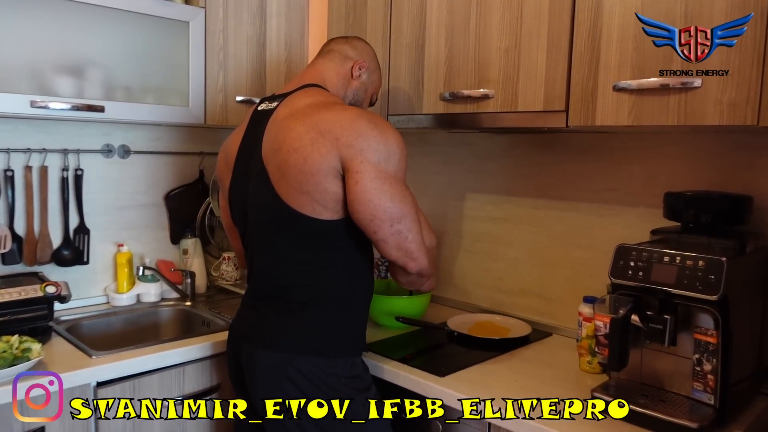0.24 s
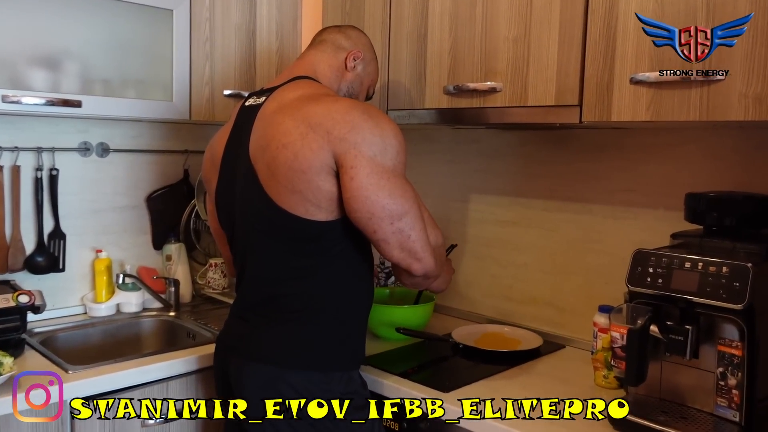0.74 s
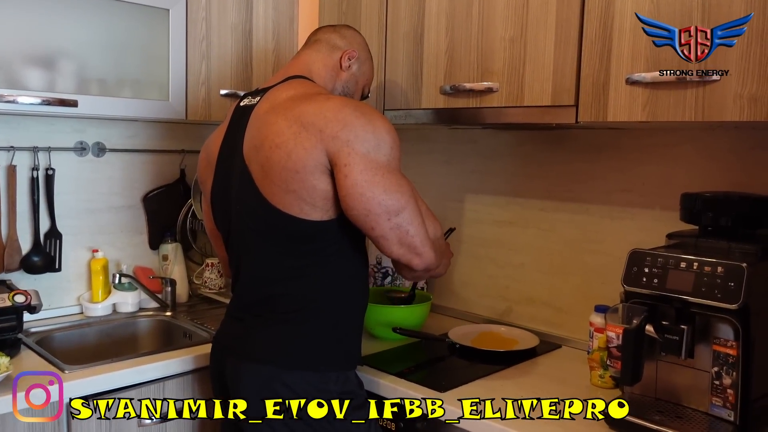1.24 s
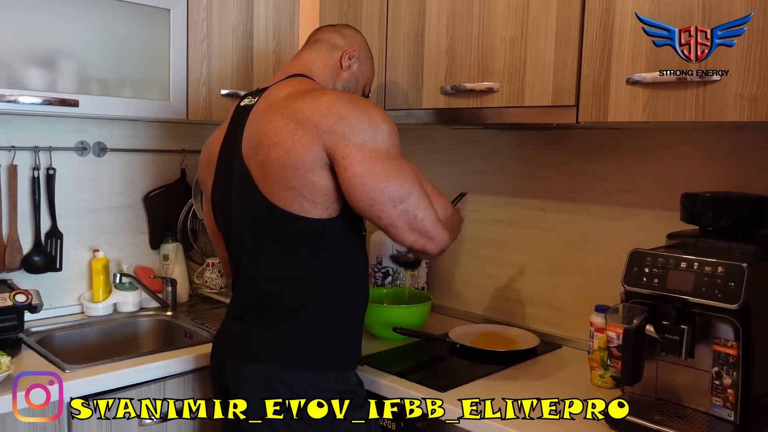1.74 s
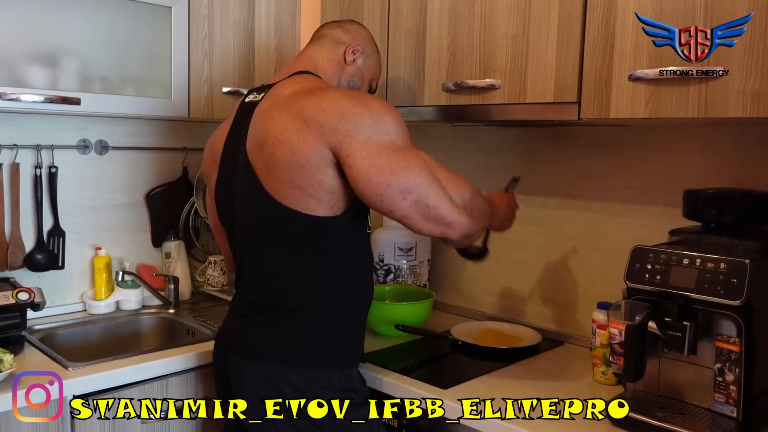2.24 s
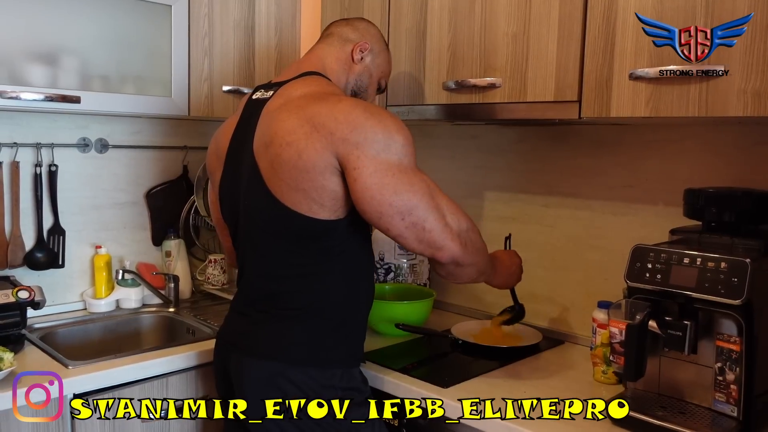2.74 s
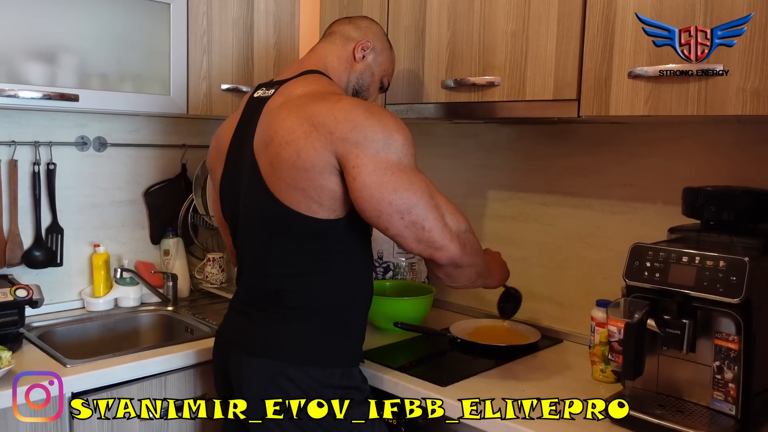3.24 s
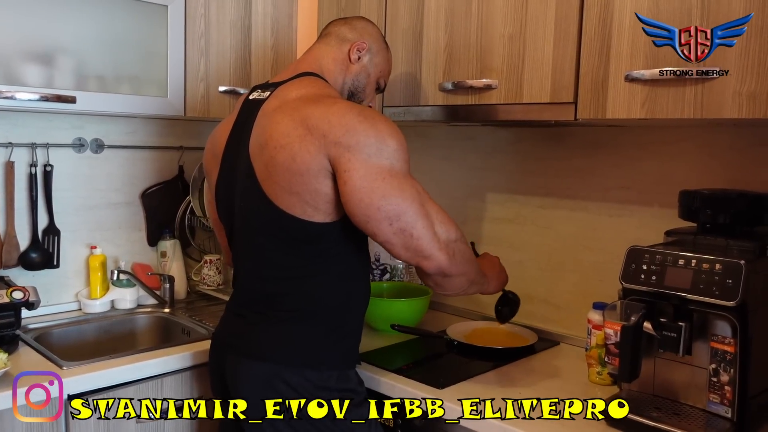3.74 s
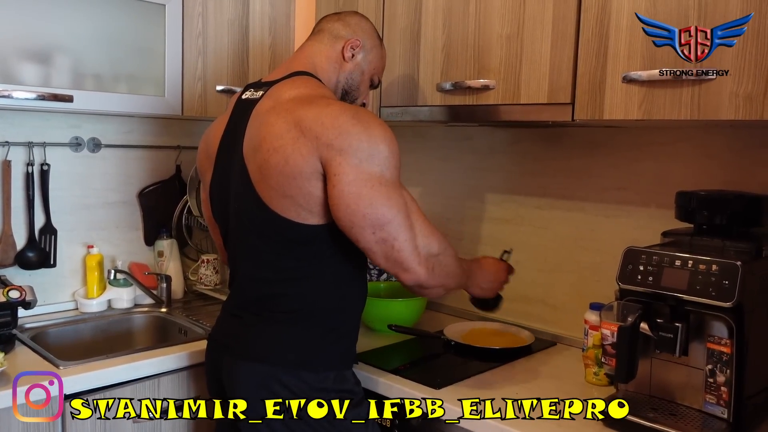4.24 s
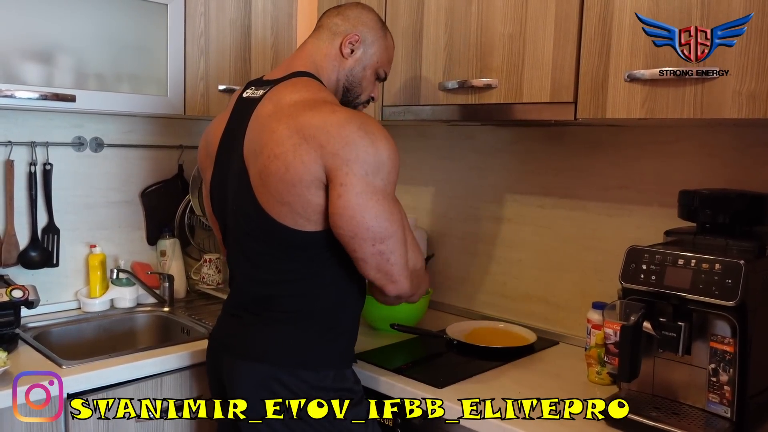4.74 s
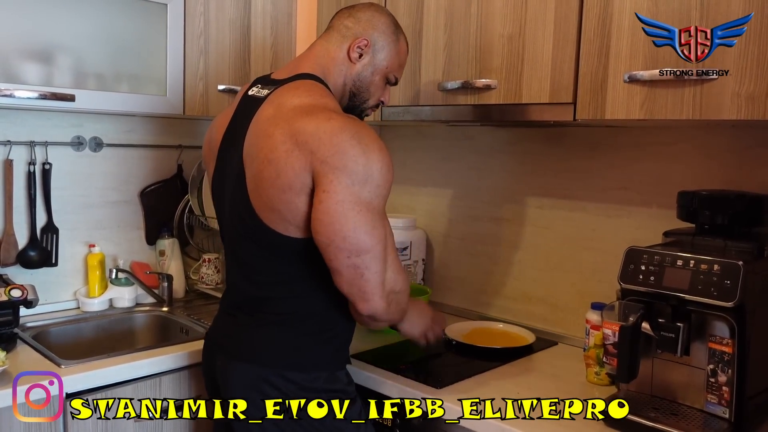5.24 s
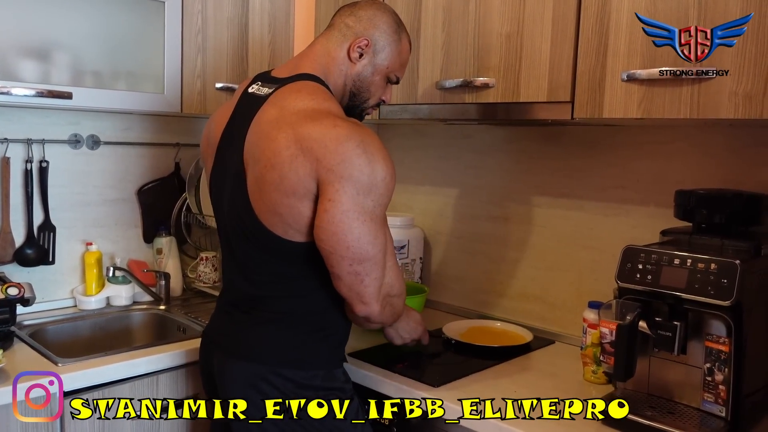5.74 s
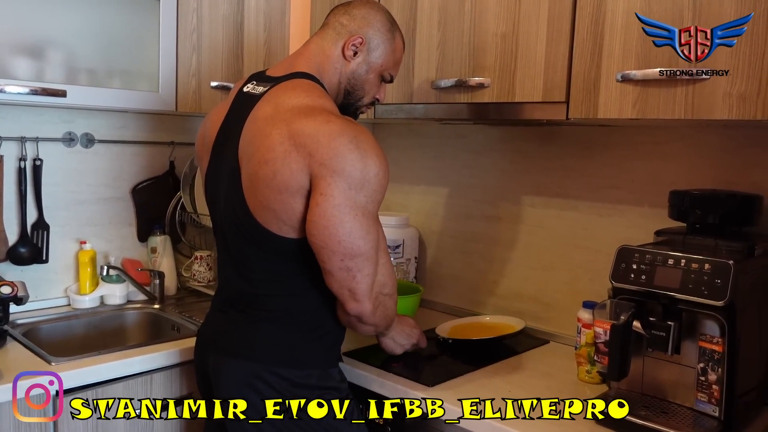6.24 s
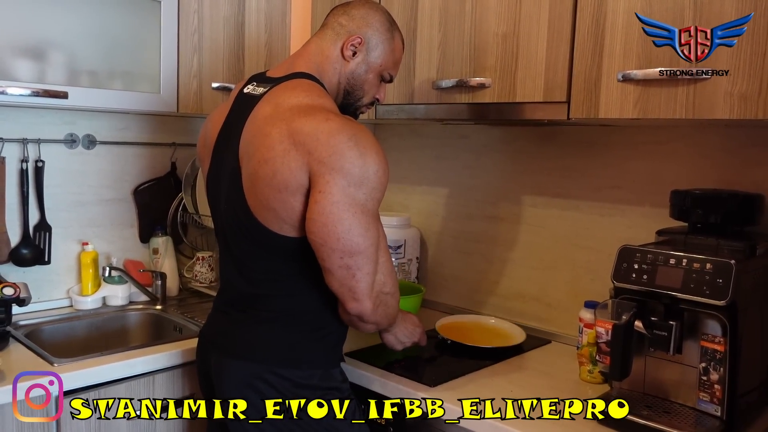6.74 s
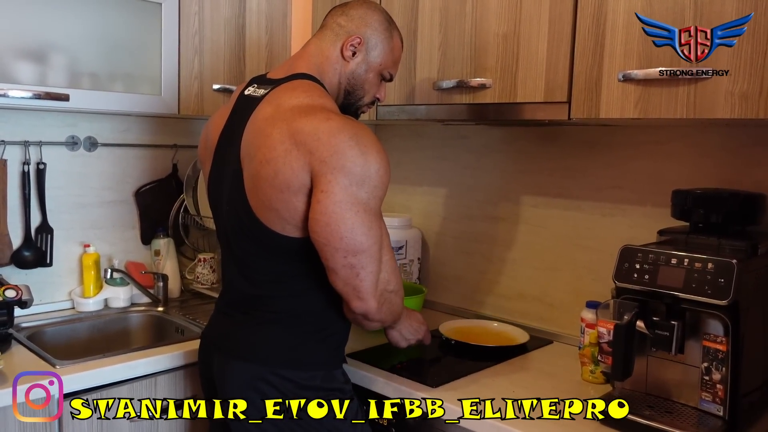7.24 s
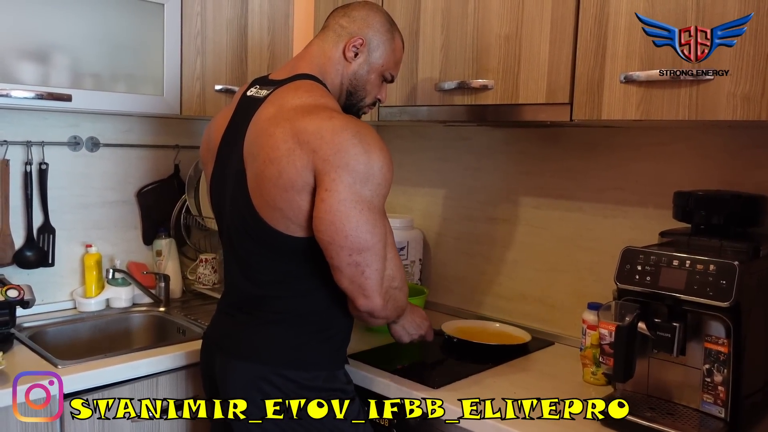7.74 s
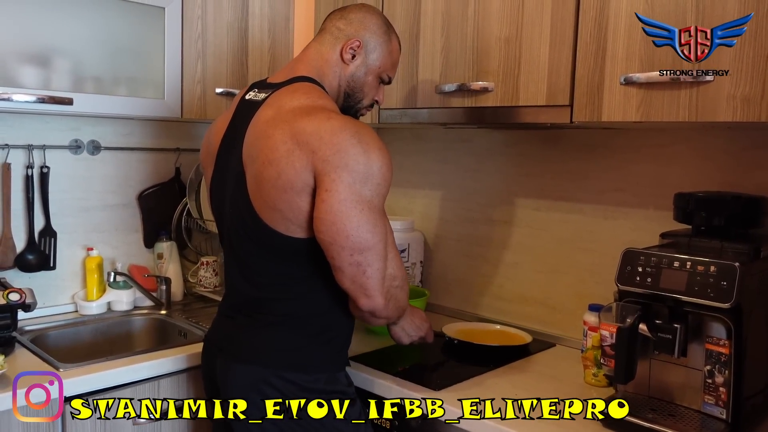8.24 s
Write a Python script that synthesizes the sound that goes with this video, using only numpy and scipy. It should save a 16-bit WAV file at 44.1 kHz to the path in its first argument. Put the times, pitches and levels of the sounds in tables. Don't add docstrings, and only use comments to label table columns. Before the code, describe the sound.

Close kitchen frying: steady fan hum, crackling hiss surging as batter is poured, fat spitting, a ladle rattling in a bowl, then the pan thumping down.

```python
import sys
import numpy as np
from scipy import signal
from scipy.io import wavfile
from scipy.ndimage import uniform_filter1d

SR = 44100
rng = np.random.default_rng(int(sys.argv[2]) if len(sys.argv) > 2 else 0)


def boost(x):
    u = np.asarray(x, float) / 20
    return 10 ** u


def wrap_up_sound(samples):
    columns = np.atleast_2d(samples).T
    tamed = np.clip(columns, -1, 1)
    steps = np.round(tamed * 32767).astype(np.int16)
    wavfile.write(sys.argv[1], SR, steps)


N = 374850

# (frequency [Hz], density [dB per Hz])
FAN_WASH = [(18, -70), (32, -66), (103, -25), (270, -6.5), (333, -6), (608, -20), (1000, -21.5),
            (1330, -13), (1480, -22.5), (2430, -22), (2850, -16), (3900, -19), (5200, -12), (12300, -27.5),
            (15600, -30)]
# (frequency [Hz], width [Hz], level over the wash [dB])
DUCT_MODES = [(334.8, 21.5, 23.6), (424, 21, 11.2), (1338, 33, 3.2), (1714, 300, 9.4), (3380, 540, 2.3),
              (5630, 410, 1), (12200, 620, 7.4)]
# (frequency [Hz], likeness [0-1])
MIC_LIKENESS = [(60, 0.26), (300, 1), (700, 0.45), (1650, 0.74), (4970, 0.77), (15000, 0.79)]
# (time [s], level [dB])
DUCT_BOOM = [(0.0, -45), (0.87, -50), (1.06, -46.5), (1.47, -47.5), (2.65, -46.5), (2.98, -48), (3.36, -47),
             (3.97, -48), (4.12, -45.5), (4.95, -48.5), (5.28, -46), (5.66, -47.5), (6.86, -47.5),
             (7.13, -48.5), (8.14, -46), (8.5, -46.5)]
# (start [s], hold [s], centre [Hz], level over the wash [dB])
COOK_STIRS = [(.45, 0.29, 690, -5), (0.953, 0.39, 2400, 3), (0.952, 0.39, 1250, 1.5),
              (1.597, 0.055, 1400, 2), (1.95, 0.2, 800, 4.5), (2.4, 0.21, 2240, 4), (3.25, 0.36, 175, 3),
              (3.9, .3, 650, 1.5), (4.2, .5, 2500, -1), (4.694, 0.26, 175, 3.5), (5.45, 0.36, 770, 6),
              (5.6, .2, 140, 3.5), (6.0, 0.53, 142, 3.5), (7.848, 0.18, 840, 0.5)]
# (frequency [Hz], density [dB per Hz])
FRYING_COLOUR = [(410, -67), (700, -8.5), (944, -22.5), (1340, -8), (1570, -18), (2030, -7.5),
                 (2440, -13.5), (2740, -8), (5740, -2), (12200, -5.5), (15600, -8.5)]
# (start [s], vigour [dB], hold [s], fade [dB/s], fine spray over the vigour [dB])
BATTER_FLARES = [(-.05, -40, .1, 16, -4), (.84, -51.5, .1, 21, -12), (1.673, -45.5, 0.074, 32, -13),
                 (2.247, -33.5, .02, 38, -0.5), (2.803, -46.5, .15, 20, -4), (3.023, -31.5, 0.11, 28, -12),
                 (3.4, -50, 0.054, 25, -17), (3.617, -51, 0.17, 49, 8), (4.366, -52, .03, 25, -4),
                 (4.65, -56.5, 0.55, 17, -5), (5.417, -50.5, 0.091, 30, -3), (5.65, -47.5, 0.045, 29, -22),
                 (6.198, -38, 0.2, 35, -11.5), (6.587, -45.5, 0.37, 6, -2.5), (7.45, -56, 0.36, 22, 15)]
# (time [s], peak [dB], centre [Hz], spread [octaves])
BUBBLES = [(0.019, -21, 2860, 0.29), (0.194, -33, 780, 0.24), (0.215, -18, 3370, 0.45),
           (0.229, -27, 2850, 0.31), (0.927, -23, 2630, 0.5), (1.022, -33, 1390, 0.27),
           (1.213, -30, 1230, 0.17), (1.564, -23.5, 3680, 0.28), (2.282, -18, 3560, 0.21),
           (2.484, -13, 4300, 0.46), (4.974, -27, 2400, 0.28), (5.695, -33, 1900, 0.6),
           (8.103, -31, 2660, 0.39)]
# (time [s], peak [dB], centre [Hz], spread [octaves])
FAT_SPITS = [(0.0794, -22, 11900, 0.8), (0.2687, -29, 9230, 0.74), (0.2994, -29, 8960, 0.74),
             (0.367, -21, 13100, 1.1), (0.4827, -30, 8570, 0.8), (0.6209, -28.5, 8650, 0.94),
             (0.784, -29.5, 9330, 0.88), (0.84, -22, 13000, 1.2), (0.9894, -32, 8590, 0.8),
             (1.3427, -36, 12200, 0.74), (1.6755, -31, 8880, 0.68), (1.7494, -27, 8770, 1),
             (2.4094, -31, 11300, 0.8), (2.6594, -26.5, 11200, 0.82), (2.7655, -26, 9620, 0.87),
             (2.8992, -20.5, 11300, 0.92), (2.9494, -27, 10300, 0.8), (3.2394, -26, 11400, 0.8),
             (3.4344, -32, 8740, 0.86), (3.8994, -33, 9580, 0.8), (4.376, -31, 9510, 0.8),
             (4.739, -22.5, 8900, 0.85), (4.8972, -35, 10100, 0.8), (6.6372, -33, 8920, 0.8),
             (7.2294, -49, 12200, 0.8), (8.1458, -28, 13700, 0.66)]
# (time [s], peak [dB], centre [Hz], spread [octaves])
LIGHT_TAPS = [
    (2.7945, -27, 2600, 0.98),
    (2.799, -23.5, 4350, 0.56),
    (4.740, -25.5, 3900, 0.65),
    (5.31, -41.5, 130, 0.51),
    (5.4, -58, 88, .4),
    (6.284, -29, 704, 0.86),
    (6.75, -51.5, 92, 0.54),
    (7.7045, -28, 1700, 1),
    (7.712, -30.5, 3180, 0.55),
]
# (time [s], pitch [Hz], level [dB])
STEAM_PUFFS = [
    (3.029, 6540, -44),
    (3.052, 5950, -40),
    (3.138, 5970, -37),
    (3.186, 5880, -21),
    (3.27, 6250, -37),
    (3.33, 6400, -38),
    (3.395, 6400, -28.5),
    (3.445, 6360, -29),
    (3.505, 6430, -36),
]
# (time [s], peak [dB], brightness [dB per octave])
LADLE_BLOWS = [(5.0968, -10, 2.5), (5.0995, -12, 2), (5.1022, -2, 1.4), (5.116, -19, -5),
               (5.13, -18.5, -13.5), (5.146, -20, 4), (5.2092, -10, -0.5), (5.2125, -6.5, 0.5),
               (5.2155, -7.5, -3.5), (5.228, -16, 14), (5.242, -22, -8), (5.27, -20, 1.5),
               (5.279, -16, -6.5), (5.298, -20.5, -3.5)]
# (frequency [Hz], level [dB])
BOWL_COLOUR = [(35, -68), (65, -45), (130, -29), (220, -13.5), (420, -14.5), (600, -4), (1000, -7.5),
               (1420, 1), (1800, -2.5), (2150, -5.5), (2520, -4), (3300, -14.5), (6000, -15),
               (15600, -29.5)]
# (frequency [Hz], level [dB], t60 [s])
BOWL_RING = [(346.4, 4.5, 0.15), (595, 1, 0.073), (820, -21, 0.068), (1393, -13, 0.24), (1890, -11, 0.057),
             (2660, -16, 0.044)]
# (time [s], peak [dB], brightness [dB per octave])
PAN_BLOWS = [
    (6.279, -21.5, -3.5),
    (6.6462, -4, 2.9),
    (6.6482, -1, 1.8),
    (6.6545, -5, 0.3),
    (6.666, -8.5, -3),
    (6.688, -9, 0),
    (6.712, -12.5, -1.5),
]
# (frequency [Hz], level [dB])
HOB_COLOUR = [(40, -65), (70, -31), (190, -11), (330, -3.5), (470, -4.5), (900, -5), (1800, -1.5),
              (3000, -4), (4400, -16), (6500, -28), (9000, -42), (16000, -43)]
# (frequency [Hz], level [dB], t60 [s])
HOB_RING = [(372, -5, 0.15), (1175, -1, 0.11), (1790, -20, .1), (2300, -26, .15), (2360, -8, 0.096),
            (2800, -4, 0.11)]
# (time [s], level [dB])
PAN_DRAG = [
    (8.38, -45),
    (8.386, -63),
    (8.402, -40),
    (8.5, -33),
]
# (frequency [Hz], level [dB])
DRAG_COLOUR = [(35, -64.5), (60, -56), (141, 1), (401, 0.5), (837, -20), (1280, -16), (1610, -26),
               (3000, -25), (3900, -52), (6600, -120)]
# (frequency [Hz], t60 [s])
WALL_T60 = [(100, 0.77), (500, 0.5), (2000, 0.43), (6000, 0.38), (14000, 0.16)]


def evened(x):
    return x / np.sqrt(np.mean(x ** 2) + 1e-20)


def read(points, hz):
    f, value = np.transpose(points)
    return np.interp(np.log(hz + 1), np.log(f + 1), value)


def curve(rows, t):
    s, level_db = np.transpose(rows)
    return np.interp(t, s, level_db)


def drift(shape, bins, frames):
    across_hz = uniform_filter1d(rng.standard_normal(shape), bins, 0)
    return evened(uniform_filter1d(across_hz, frames, 1))


def pair(a, b, hz):
    same = np.clip(read(MIC_LIKENESS, hz), 0, 1)[:, None]
    side = np.sqrt((1 - same) / (1 + same)) * b
    return np.array([a + side, a - side]) * np.sqrt((1 + same) / 2)


def causal(db):
    log = np.maximum(np.r_[db, db[-2:0:-1]], -100) * np.log(10) / 20
    return np.fft.ifft(np.exp(np.conj(signal.hilbert(log)))).real[:2048]


def peaks(t, start, db, hold, rise, fade):
    start, db, hold, fade = [np.reshape(x, (-1, 1)) for x in (start, db, hold, fade)]
    late = t - start
    fall_db = rise * np.maximum(-late, 0) + fade * np.maximum(late - hold, 0)
    return boost(2 * (db - fall_db))


def place(rows, sounds, scatter_db, scatter_s):
    fade = np.exp(-np.arange(1500) / SR / scatter_s)
    scatter = rng.standard_normal((len(rows), 1500)) * fade * boost(scatter_db) / np.linalg.norm(fade)
    scatter[:, 0] = 1
    train = np.zeros(N + 4096)
    for row, sound, echoes in zip(rows, sounds, scatter):
        hit = signal.fftconvolve(sound / abs(sound).max(), echoes)
        train[round(row[0] * SR):][:3547] += boost(row[1]) * hit
    return train[:N]


def kitchen(x, tail_db):
    size = SR // 2
    taps = np.zeros((3, size))
    at = np.arange(60, size - 20, 20) + rng.integers(0, 20, (3, (size - 61) // 20))
    np.put_along_axis(taps, at, rng.choice([-1., 1.], at.shape), 1)
    hz, t, z = signal.stft(taps, SR, nperseg=256)
    z = z * boost(-60 * t / read(WALL_T60, hz)[:, None])
    tail = signal.istft(z, SR, nperseg=256)[1][:, :size]
    tail = boost(tail_db) * tail / np.linalg.norm(tail[0])
    side = 0.26 * signal.lfilter(*signal.butter(1, 1800 / SR, "high"), tail[1] - tail[2])
    echo = tail[0] + np.array([side, -side])
    echo[:, 0] += 1
    return signal.fftconvolve(x[None], echo, axes=1)[:, :N]


def fan(level_db=-41, boom_hz=335, stir_edge_s=0.096):
    frames, hz = N // 512 + 5, np.fft.rfftfreq(2048, 1 / SR)
    t = np.arange(frames) * 512 / SR
    a, b, c, d = rng.standard_normal((frames, len(hz), 4)).T
    colour_db = read(FAN_WASH, hz)
    colour_db = colour_db + sum(db / (1 + (2 * (hz - f) / w) ** 2) for f, w, db in DUCT_MODES)
    boom_db = curve(DUCT_BOOM, t)
    swell_db = np.outer(np.exp(-4 * np.log2((hz + 1) / boom_hz) ** 2), boom_db - np.median(boom_db))
    for s, hold, centre_hz, db in COOK_STIRS:
        shape = np.clip(np.minimum(t - s, s + hold - t) / stir_edge_s + 1, 0, 1)
        swell_db = swell_db + db * np.outer(np.exp(-2.5 * np.log2((hz + 1) / centre_hz) ** 2), shape)
    gusts_db = 0.7 * drift(a.shape, 20, 8)
    room_modes_db = 3.13 * drift(a.shape, 2, 12) * (hz[:, None] > 450)
    field_db = colour_db[:, None] + 1.5 * swell_db + gusts_db + room_modes_db
    z = pair(a + 1j * b, c + 1j * d, hz) * boost(field_db)
    return boost(level_db) * evened(signal.istft(z, nperseg=2048, noverlap=1536)[1][:, :N])


def vigour(t, rise_db_per_s=336, simmer_db=-53, simmer_spray_db=-7):
    start, db, hold, fade, spray_db = np.transpose(BATTER_FLARES)
    power = peaks(t, start + 0.026, db, hold, rise_db_per_s, fade)
    simmer = boost(2 * simmer_db)
    total = power.sum(0) + simmer
    level_db = 10 * np.log10(total)
    mean_spray_db = (spray_db @ power + simmer_spray_db * simmer) / total
    coarse_db = 3.5 - 0.52 * (level_db - simmer_db)
    return level_db, mean_spray_db, coarse_db


def frying(per_s=5000, spread_db=2.5, hiss=0.79, flicker_db=1.0, patchy_db=1.0):
    size = boost(spread_db * np.minimum(rng.exponential(1, (2, N)), 6))
    clicks = size * (rng.random((2, N)) < per_s / SR) * rng.choice([-1, 1], (2, N))
    spot = rng.integers(0, 16, N)
    smears = 0.92 * rng.standard_normal((16, 600)) * np.exp(-np.arange(600) / 205.0)
    echoes = np.zeros((2, N))
    for k, smear in enumerate(smears):
        echoes += signal.oaconvolve(clicks * (spot == k), smear[None], axes=1)[:, :N]
    bursts = evened(clicks + echoes)
    hissing = bursts + hiss * rng.standard_normal((2, N))
    hz, t, z = signal.stft(hissing, SR, nperseg=256, noverlap=192)
    vigour_db, spray_db, coarse_db = vigour(t)
    octave = np.log2((hz[:, None] + 1) / 6000)
    top, bottom = np.clip(octave / 1.9, 0, 1), np.clip(-octave / 1.14, 0, 1)
    field_db = read(FRYING_COLOUR, hz)[:, None] + top * (spray_db + 1.0) + bottom * (coarse_db + 5.5)
    field_db = field_db + flicker_db * drift(z[0].shape, 60, 10) + patchy_db * drift(z[0].shape, 5, 16)
    heard = pair(z[0], z[1], hz) * boost(field_db + vigour_db)
    return boost(7.5) * signal.istft(heard, SR, nperseg=256, noverlap=192)[1][:, :N]


def pops(rows, scatter_db, scatter_s):
    hz = np.fft.rfftfreq(4096, 1 / SR) + 1
    clicks = [causal(-6 * (np.log2(hz / f) / max(octaves, .05)) ** 2) for s, db, f, octaves in rows]
    return place(rows, clicks, scatter_db, scatter_s)


def bubbles():
    return kitchen(boost(-15.5) * pops(BUBBLES, scatter_db=9.0, scatter_s=0.0057), tail_db=1.5)


def spits():
    return kitchen(boost(-8.5) * pops(FAT_SPITS, scatter_db=15.5, scatter_s=0.0084), tail_db=-2.0)


def light_taps():
    return kitchen(boost(-3.0) * pops(LIGHT_TAPS, scatter_db=10.0, scatter_s=0.0096), tail_db=-5.0)


def steam(start_s=3.0, end_s=3.6, width_hz=350, flutter_db=4.0):
    t = np.arange(start_s, end_s, 1 / SR)
    start, pitch, puff_db = np.transpose(STEAM_PUFFS)
    hz = np.interp(t, start, pitch)
    db = 10 * np.log10(peaks(t, start, puff_db, 0, rise=1500, fade=246).sum(0))
    low = signal.lfilter(*signal.butter(2, width_hz / SR), rng.standard_normal((2, len(t))))
    tone = ((low[0] + 1j * low[1]) * np.exp(2j * np.pi * np.cumsum(hz) / SR)).real
    flutter = evened(uniform_filter1d(rng.standard_normal(len(t)), 200))
    whistle = evened(tone * boost(flutter_db * flutter)) * boost(db - 6.5)
    out = np.zeros(N)
    out[round(t[0] * SR):][:len(t)] = whistle * signal.windows.tukey(len(t), .2)
    return out


def knocks(rows, colour, modes, ring_db, scatter_db, scatter_s):
    hz, t = np.fft.rfftfreq(4096, 1 / SR), np.arange(SR // 3) / SR
    octave = np.log2((hz + 400) / 1900)
    clicks = [causal(read(colour, hz) + tilt_db * octave) for s, db, tilt_db in rows]
    blows = place(rows, clicks, scatter_db, scatter_s)
    ring = sum(boost(db - 60 * t / t60) * np.sin(2 * np.pi * f * t) for f, db, t60 in modes)
    return blows + boost(ring_db) * signal.oaconvolve(blows, ring)[:N]


def ladle():
    blows = knocks(LADLE_BLOWS, BOWL_COLOUR, BOWL_RING, ring_db=-44.5, scatter_db=7.5, scatter_s=.0035)
    return kitchen(boost(-3.0) * blows, tail_db=-3.0)


def pan_knocks():
    blows = knocks(PAN_BLOWS, HOB_COLOUR, HOB_RING, ring_db=-44.5, scatter_db=5.0, scatter_s=0.0054)
    return kitchen(boost(-2.0) * blows, tail_db=-2.0)


def drag():
    t = np.arange(N) / SR
    unevenness = evened(uniform_filter1d(rng.standard_normal(N), 150))
    slips = rng.standard_normal(N) * boost(2.5 * unevenness)
    pushed = slips * boost(curve(PAN_DRAG, t)) * (t > PAN_DRAG[0][0])
    body = causal(read(DRAG_COLOUR, np.fft.rfftfreq(4096, 1 / SR)))
    return boost(-1.5) * signal.oaconvolve(pushed, body / np.linalg.norm(body))[:N]


def scene():
    mix = fan() + frying() + steam() + drag()
    mix += bubbles() + spits() + light_taps()
    mix += ladle() + pan_knocks()
    return mix * boost([[.2], [-.2]])


def roll_off(x):
    return signal.sosfilt(signal.butter(12, 17020, fs=SR, output="sos"), x)


def record(dry):
    power_db = 10 * np.log10(abs(uniform_filter1d((dry ** 2).mean(0), 300)) + 1e-12)
    fall = np.arange(N) * 13.3 / SR
    over_db = np.maximum(np.maximum.accumulate(power_db + fall) - fall + 10.0, 0)
    ducked = dry / boost(0.16 * uniform_filter1d(over_db, 300, origin=149))
    overloaded = np.tanh(ducked / 1.543) * 1.668
    edge = signal.firwin(511, 15850, window=("kaiser", 5), fs=SR)
    mix = signal.oaconvolve(overloaded, edge[None], "same")
    return roll_off(mix)


dry = scene()
out = record(dry)
wrap_up_sound(out)
```